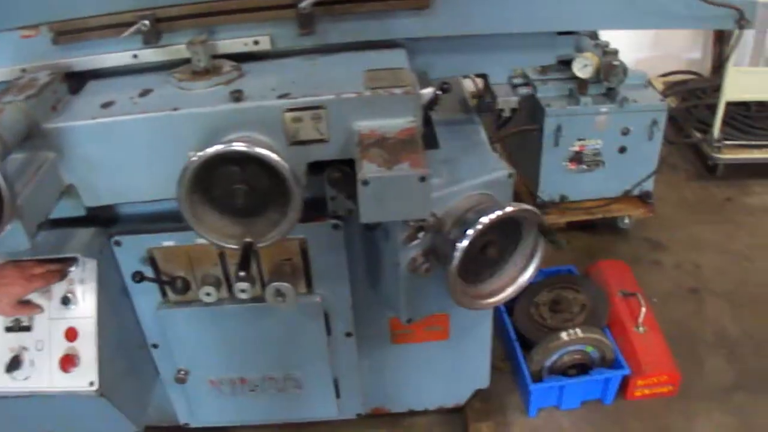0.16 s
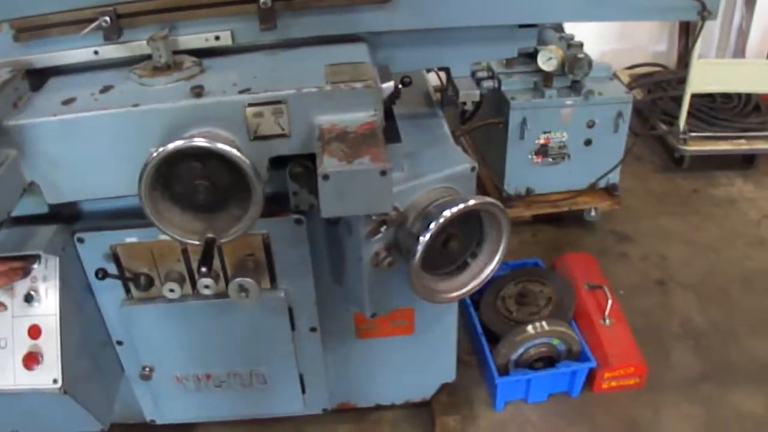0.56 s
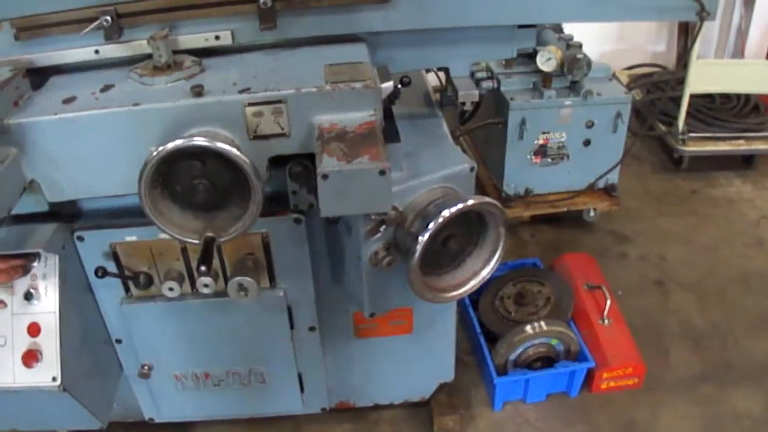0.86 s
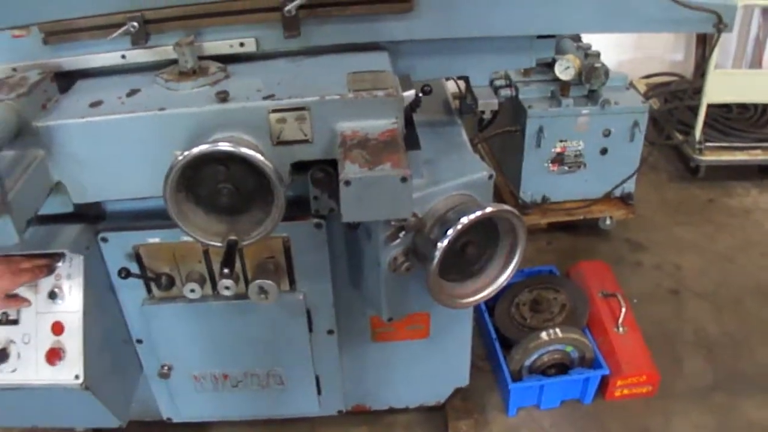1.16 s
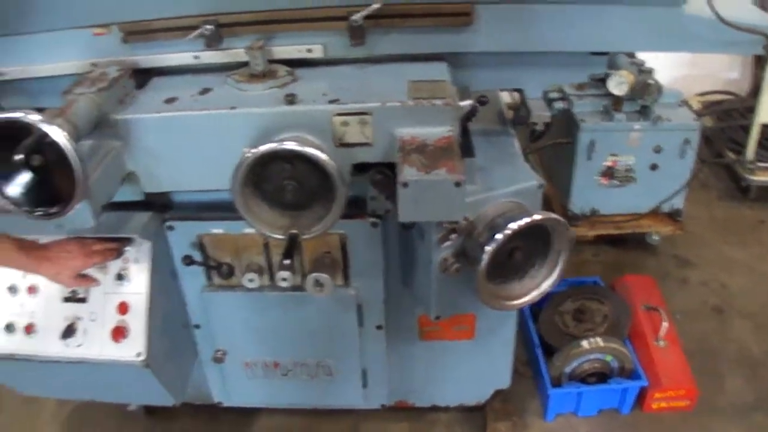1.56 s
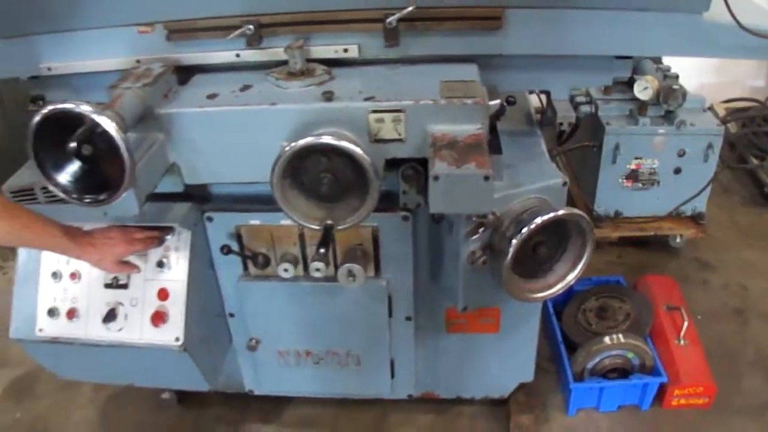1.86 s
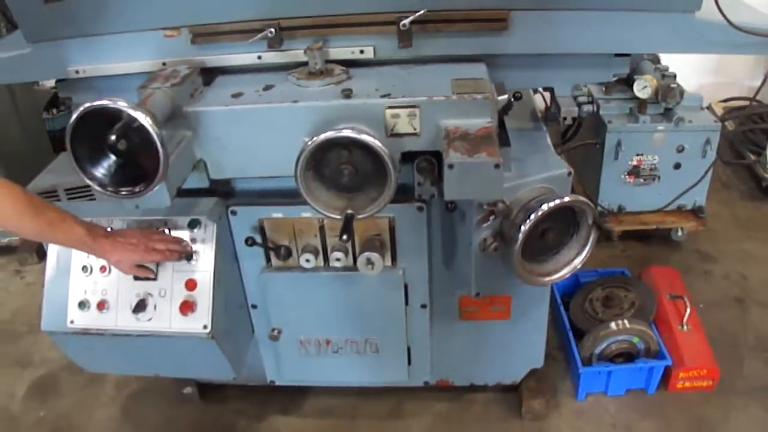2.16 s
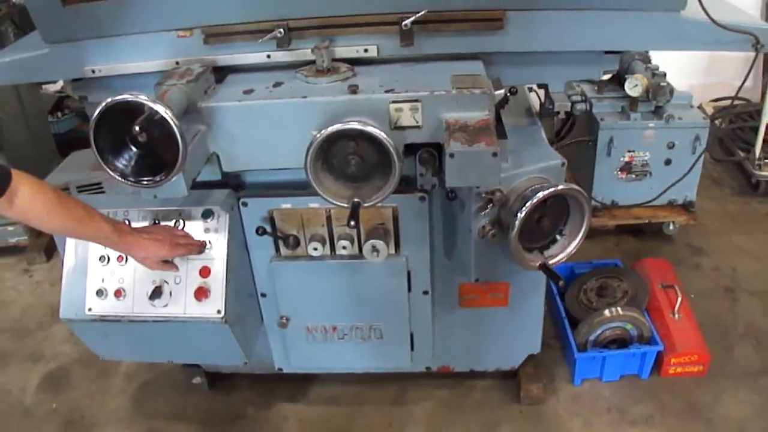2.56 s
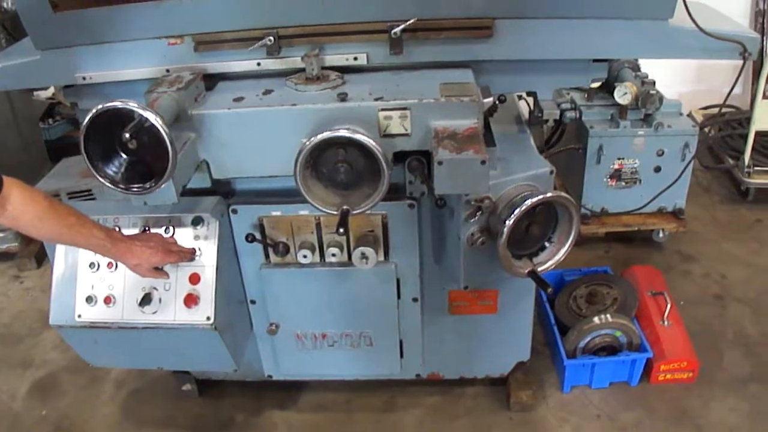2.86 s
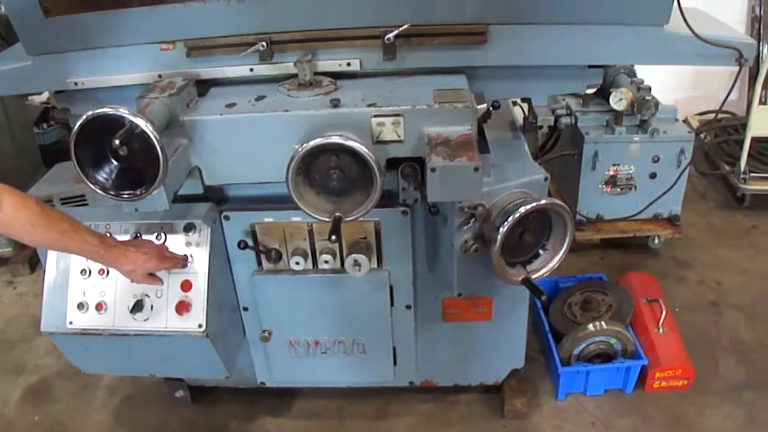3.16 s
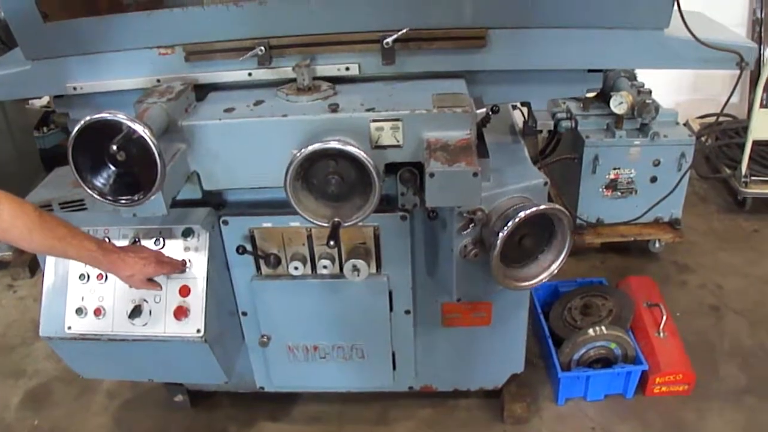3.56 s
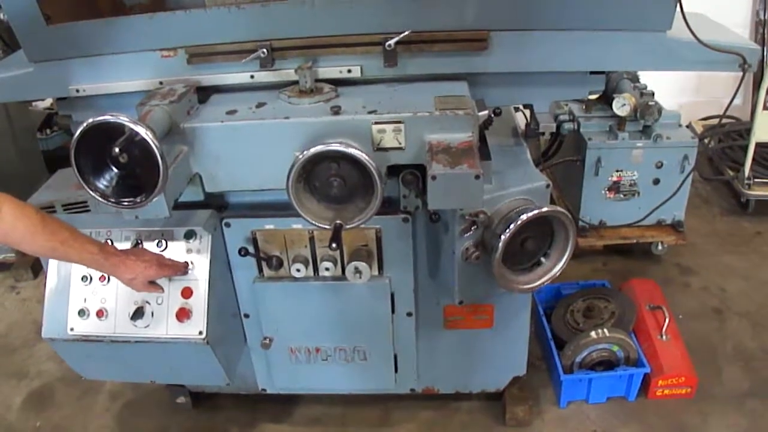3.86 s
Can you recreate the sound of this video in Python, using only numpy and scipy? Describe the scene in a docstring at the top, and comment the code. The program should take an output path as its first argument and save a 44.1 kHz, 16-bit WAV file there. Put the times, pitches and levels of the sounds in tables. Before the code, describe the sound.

A workshop grinder clatters, whines and ticks steadily, then winds down with rattling metal panels. After a short, quiet pause, a light click and an electrical clack restart it, and the ticking returns with a thin bearing squeal.

```python
"""A hydraulic pump runs in a workshop, coasts down and restarts with a contactor clack. Its drive clatters with
each shaft turn and belt lap, whines on shaft orders and ticks once a lap, about every fifth turn; the bearings
hiss and squeal. The cabinet booms and its panels rattle as the speed falls and rises. A soft hiss swells as it
comes to rest; mains hum and distant machines fill the pause."""
import sys
import numpy as np
from scipy import signal
from scipy.fft import rfft, irfft
from scipy.io import wavfile
from scipy.ndimage import uniform_filter1d, map_coordinates

SR = 44100
rng = np.random.default_rng(int(sys.argv[2]) if len(sys.argv) > 2 else 0)


def dump_mix(stems):
    """Bounce the given channels to the path in sys.argv[1] as a 16-bit WAV at rate SR."""
    frames = np.atleast_2d(stems).T  # one column per channel
    limited = np.clip(frames, -1, 1)  # hard clip at full scale
    pcm = np.round(limited * 32767).astype(np.int16)
    wavfile.write(sys.argv[1], SR, pcm)


N = 176400
RESTART_S = 3.25

FIRST_RPS, SECOND_RPS = 29.0, 29.26
# time_s, speed_rps
SHAFT_SPEED = [(0, FIRST_RPS), (1.82, FIRST_RPS), (1.92, 27), (2.02, 21.5), (2.13, 17.4), (2.35, 9),
               (2.6, 1), (3.25, 1), (3.35, 9), (3.415, 16.8), (3.44, 18), (3.475, 23), (3.52, 26.8),
               (3.55, 27.3), (3.59, 28.9), (3.66, SECOND_RPS), (4, SECOND_RPS)]


def shaft():
    """Slightly wobbling shaft speed and the running count of turns."""
    speed_rps = curve(SHAFT_SPEED) * (1 + 0.0015 * walk(25.47))
    return speed_rps, np.cumsum(speed_rps) / SR


# position_laps, width_laps, gain_db
LAP_SWELLS = [(.18, 0.023, 0.5), (.55, 0.029, 3), (.73, 0.04, 2)]
TURNS_PER_BELT = 5


def drive(turns):
    """Rough shaft and belt plus loose rattle, throbbing with each turn and swelling within each lap."""
    laps = turns / TURNS_PER_BELT
    rotating = undb(-5.5) * roughness(turns, points=1500) + undb(2.5) * roughness(laps, points=7500)
    throb = 1 + 0.16 * np.sin(2 * np.pi * turns) * np.sin(2 * np.pi * 3 * turns)
    swell_db = sum(db * np.exp(-((laps % 1 - at) / width) ** 2) for at, width, db in LAP_SWELLS)
    reverberant = room(rotating)
    loose = undb(-7) * rng.standard_normal(N)
    return throb * undb(swell_db) * (reverberant + loose)


def roughness(cycles, points):
    """The same random surface passes on every cycle of a rotating part."""
    return map_coordinates(rng.standard_normal(points), [cycles % 1 * points], order=1, mode="grid-wrap")


# freq_hz, gain_db
BEARING_SPECTRUM = [(2500, 8), (3500, -43), (4300, 3), (5200, 0.5), (6100, 3), (6700, 4.5), (7500, 2.5),
                    (8000, 4), (8650, 0), (9100, -6), (9500, -7), (9900, -6), (10250, -13.5), (10500, -1.5),
                    (11000, -19)]
# pitch_hz, width_hz, level_db
JINGLE_MODES = [(7600, 220, -5), (8150, 200, -4), (8580, 200, -0.5)]


def bearings():
    """Bearing hiss with an uneven metallic jingle."""
    jingle = unit(undb(4 * walk(90)) * rings(JINGLE_MODES))
    return undb(-0.5) * noise(BEARING_SPECTRUM) + undb(-7) * jingle


# time_s, drive_db, bearing_db
RUN_LEVELS = [(0.03, -21.5, -41), (0.06, -22, -42), (0.86, -23.5, -42.5), (1.96, -21.5, -41),
              (2.0, -21, -38.5), (2.21, -27.5, -49.5), (2.32, -35.5, -56), (2.44, -39, -62)]
RESTART_LEVELS = [(3.29, -39, -75), (3.402, -25, -44.5), (3.672, -20, -36.5), (3.682, -22.5, -39.5),
                  (3.96, -20.5, -40), (3.97, -20, -40.5)]
# freq_hz, gain_db
RUN_SPECTRUM = [(100, -42), (200, -28.5), (280, -19.5), (360, -5), (420, -8.5), (520, -5.5), (630, 0.5),
                (740, -1.5), (880, -2), (1050, -4), (1180, -3), (1500, -6.5), (1850, -10.5), (2300, -13),
                (2700, -16.5), (3000, -15), (3300, -23), (4000, -27)]
RESTART_SPECTRUM = [(100, -25.5), (270, -17), (360, -9.5), (520, -1.5), (620, 7), (760, -3.5), (900, 2.5),
                    (1250, -3), (1550, -0.5), (1900, -5), (2400, -11), (3100, -14), (4000, -22.5)]
DRIVE_TRIM_DB, STOP_DB_PER_S, FADE_IN_S = -1, 43, 0.03


def clatter(turns):
    """Drive and bearing noise dies away on coast-down and returns with a new timbre on restart."""
    rattle, bearing = drive(turns), bearings()

    def run(levels, spectrum):
        body = undb(curve(levels) + DRIVE_TRIM_DB) * colour(rattle, spectrum)
        return body + undb(curve(levels, column=2)) * bearing

    t = times()
    fade_out = undb(-STOP_DB_PER_S * np.maximum(t - RUN_LEVELS[-1][0], 0))
    fade_in = np.clip((t - RESTART_S) / FADE_IN_S, 0, 1)
    return fade_out * run(RUN_LEVELS, RUN_SPECTRUM) + fade_in * run(RESTART_LEVELS, RESTART_SPECTRUM)


# shaft_order (rounded when played), run_db, restart_db
WHINE_ORDERS = [(12, -45.5, -56), (13, -42, -50), (16, -20.5, -23), (19, -50, -38), (20, -39.5, -27.5),
                (21, -40, -21), (23, -48.5, -63), (25, -40, -43), (28, -34.5, -44), (29, -48.5, -32),
                (31, -34, -61), (32.02, -28.5, -24), (42, -49, -33), (45, -38.5, -37), (48, -46, -44),
                (52.05, -54, -34), (67.6, -80, -44), (78.03, -44.5, -43)]
# time_s, gain_db
WHINE_GAIN = [(0, 0), (1.0, 0), (1.5, -3.5), (1.85, -5), (2.05, -8), (2.4, -12), (3.3, -3), (3.5, -3.5),
              (3.62, -2.5), (4, -4.5)]
FULL_SLIP, SLIP_DB, SPEED_EXPONENT, RADIATES_ABOVE_HZ = 0.17, -14, 1.93, 246


def whine(speed_rps, turns):
    """Shaft orders weaken and judder below full speed; the bass does not radiate."""
    speed_ratio = speed_rps / speed_rps.max()
    slip = np.clip((1 - speed_ratio) / FULL_SLIP, 0, 1)
    tones = 0
    for order, run_db, restart_db in WHINE_ORDERS:
        db = np.where(times() < RESTART_S, run_db, restart_db) + walk(19.5) + slip * walk(47)
        phase = 2 * np.pi * (np.round(order) * turns + rng.random())
        tones += np.sqrt(2) * undb(db) * np.sin(phase)
    gain = undb(curve(WHINE_GAIN) + SLIP_DB * slip) * speed_ratio ** SPEED_EXPONENT
    highpass = signal.butter(8, RADIATES_ABOVE_HZ, "high", fs=SR, output="sos")
    return signal.sosfilt(highpass, gain * tones)


# start_s, level_db
BELT_TICKS = [(0.0044, -17.5), (0.1727, -17.5), (0.345, -18.5), (0.5174, -17.5), (0.6925, -17.5),
              (0.863, -18.5), (1.0355, -16.5), (1.2067, -19.5), (1.3824, -18.5), (1.5514, -17),
              (1.7258, -20), (1.8957, -16), (2.1224, -23.5), (3.498, -17), (3.6731, -18.5), (3.8427, -19)]
# freq_hz, gain_db
TICK_SPECTRUM = [(1200, -21), (2400, -2), (2950, 4.5), (3500, -2.5), (4500, -1), (5400, 3), (6400, -0.5),
                 (7500, -6.5), (7950, 1), (8600, 7.5), (9500, -1.5), (11000, -6.5)]
# pitch_hz, width_hz, level_db
TICK_MODES = [(3090, 100, 0), (5010, 50, -4), (5550, 200, -2), (7400, 540, 5.5), (8370, 190, -5),
              (9840, 42, -5)]
TICK_LEAD_S, TICK_HOLD_S, TICK_DECAY_S = 0.0071, 0.0041, 0.0035


def belt_ticks():
    """Each tick is a light touch, a sharp slap, a short room tail and a metallic ring."""
    power, ring = 0, 0
    for start_s, db in BELT_TICKS:
        touch = undb(-5) * burst(start_s - TICK_LEAD_S, TICK_DECAY_S, TICK_HOLD_S)
        slap = burst(start_s, TICK_DECAY_S, TICK_HOLD_S)
        tail = undb(-8) * burst(start_s, decay_s=0.043)
        power += undb(db - 7.5) ** 2 * (touch ** 2 + slap ** 2 + tail ** 2)
        ring += undb(db - 21) * burst(start_s, decay_s=0.03)
    return np.sqrt(power) * noise(TICK_SPECTRUM) + ring * rings(TICK_MODES)


# peak_s, pitch_hz, level_db, half_length_s
CABINET_BOOMS = [(1.944, 441.6, -28, 0.04), (2.024, 335, -38, 0.026), (2.034, 734, -29.5, .025),
                 (2.151, 278.6, -31, 0.022), (3.437, 277, -25.5, 0.021), (3.469, 361, -27.5, 0.017),
                 (3.489, 765, -21.5, 0.01), (3.541, 429.8, -25, 0.027)]


def cabinet_booms():
    """Cabinet resonances swell briefly, timed to the shaft crossing its critical speeds."""
    booms = 0
    for peak_s, hz, db, half_length_s in CABINET_BOOMS:
        swell = undb(db + 2 * walk(77)) * np.exp(-((times() - peak_s) / half_length_s) ** 2)
        booms += np.sqrt(2) * swell * tone(hz, waver_rad=0.26, waver_hz=106)
    return booms


# pitch_hz, width_hz, level_db
PANEL_MODES = [(287.4, 12.4, -10.5), (458.5, 18, -7), (948.4, 4, -6.5), (1523, 48, -9.5)]
# time_s, gain_db
PANEL_GAIN = [(0, -42), (1.8, -35), (2.03, -28.5), (2.35, -32.5), (2.7, -50), (3.25, -51), (3.45, -35),
              (3.65, -28.5), (3.75, -41.5), (4, -40.5)]


def panels():
    """Sheet-metal panels ring at their own pitches, loudest around the speed changes."""
    return undb(curve(PANEL_GAIN)) * rings(PANEL_MODES)


# start_s, end_s, level_db
BEARING_SQUEALS = [(1.95, 2.17, -42), (2.17, 2.36, -52), (3.59, 3.70, -43), (3.77, 3.90, -46),
                   (3.91, 4.05, -44)]
SQUEAL_HZ, SQUEAL_RAMP_S = 6430, 0.035


def bearing_squeal():
    """A bearing's thin, unsteady whistle comes and goes."""
    t, envelope = times(), 0
    for start_s, end_s, db in BEARING_SQUEALS:
        envelope += undb(db) * np.clip(np.minimum(t - start_s, end_s - t) / SQUEAL_RAMP_S, 0, 1)
    flicker = undb(2 * walk(60))
    return envelope * flicker * tone(SQUEAL_HZ, waver_rad=1.3, waver_hz=120)


# start_s, level_db, decay_s
CONTACTOR_CLACKS = [(3.249, -33, 0.012), (3.263, -38, 0.0084)]
# freq_hz, gain_db
CLACK_SPECTRUM = [(150, -4), (280, -1), (1000, 3.5), (1500, 0.5), (2300, -9), (4000, -13.5), (4900, -1.5),
                  (5600, -13), (7500, -7), (11000, -21)]


def contactor():
    """The contactor closes and bounces, each clack with a room tail."""
    envelope = 0
    for start_s, db, decay_s in CONTACTOR_CLACKS:
        tail = undb(-1.5) * burst(start_s, decay_s=0.081)
        envelope += undb(db) * (burst(start_s, decay_s) + tail)
    return envelope * noise(CLACK_SPECTRUM)


# start_s, level_db
BUTTON_CLICKS = [(2.925, -41), (2.958, -38.5)]
# freq_hz, gain_db
BUTTON_SPECTRUM = [(2500, 6), (3500, 3), (7000, 0), (9000, -10)]


def button():
    """The start button clicks lightly as it is pressed."""
    envelope = sum(undb(db) * burst(start_s, decay_s=0.003) for start_s, db in BUTTON_CLICKS)
    return envelope * noise(BUTTON_SPECTRUM)


# time_s, level_db
HISS_LEVELS = [(2.43, -47), (2.475, -38), (2.52, -36.5), (2.545, -33.5), (2.58, -35), (2.6, -30.5),
               (2.64, -32), (2.7, -41), (2.85, -45), (3.2, -53.5)]
# freq_hz, gain_db
HISS_SPECTRUM = [(150, -51), (250, -21), (332, -20), (365, -15), (388, -26), (462, -7), (1410, 1),
                 (3000, -11.5), (6400, -12.5), (8490, -17), (10800, -35), (14000, -63), (22000, -120)]


def hiss():
    """A soft rush swells as the drive comes to rest."""
    return undb(curve(HISS_LEVELS) + walk(44)) * noise(HISS_SPECTRUM)


# pitch_hz, level_db
HUM_TONES = [(120, -67), (182, -55), (240, -63), (468, -67), (931, -60), (1082, -59), (2401, -69),
             (3661, -74), (6665, -77), (7868, -64)]
# freq_hz, gain_db
MACHINERY_SPECTRUM = [(15, -71), (25, -28), (148, -13), (181, -4), (245, -4), (265, -11), (872, -7),
                      (1070, -7), (1240, -16), (4540, -26.5), (7350, -45), (8130, -33), (10800, -29),
                      (14000, -78), (22000, -120)]


def workshop():
    """Mains hum, idle whines and distant machinery."""
    hum = 0
    for hz, db in HUM_TONES:
        hum += np.sqrt(2) * undb(db + 1.9 * walk(5.9)) * tone(hz, waver_rad=0.31, waver_hz=11)
    return hum + undb(-50) * noise(MACHINERY_SPECTRUM)


def room(x, t60_s=1, tail_db=-6):
    """Direct sound plus the workshop's diffuse tail."""
    tail = rng.standard_normal(SR) * undb(-60 * times()[:SR] / t60_s)
    return x + undb(tail_db) * signal.fftconvolve(x, tail / np.linalg.norm(tail))[:N]


def undb(db):
    return 10 ** (np.asarray(db) / 20)


def unit(x):
    return x / np.sqrt(np.mean(x ** 2))


def times():
    return np.arange(N) / SR


def curve(table, column=1):
    """One table column, interpolated linearly in time."""
    table = np.array(table)
    return np.interp(times(), table[:, 0], table[:, column])


def colour(x, spectrum):
    """Shape x by a spectrum, falling 37 dB per octave past both ends; rms 1."""
    hz, db = np.array(spectrum).T
    octaves = np.log2(np.maximum(np.fft.rfftfreq(N, 1 / SR), 1))
    outside = np.abs(octaves - np.clip(octaves, np.log2(hz[0]), np.log2(hz[-1])))
    gain_db = np.interp(octaves, np.log2(hz), db) - 37 * outside
    return unit(irfft(rfft(x) * undb(gain_db), N))


def noise(spectrum):
    return colour(rng.standard_normal(N), spectrum)


def rings(modes):
    """Narrow resonances shaken at random."""
    ringing = 0
    for hz, width_hz, db in modes:
        peak = signal.iirpeak(hz, hz / (2 * width_hz), fs=SR)
        band = signal.lfilter(*peak, rng.standard_normal(N))
        ringing += undb(db) * unit(signal.lfilter(*peak, band))
    return ringing


def walk(rate_hz):
    """Smooth random drift; rms 1."""
    window = int(SR / rate_hz)
    smoothed = uniform_filter1d(rng.standard_normal(N), window, mode="wrap")
    return unit(uniform_filter1d(smoothed, window, mode="wrap"))


def tone(hz, waver_rad, waver_hz):
    """Sine with drifting phase."""
    return np.sin(2 * np.pi * hz * times() + waver_rad * walk(waver_hz))


def burst(start_s, decay_s, hold_s=0, attack_s=0.004):
    """Envelope: quick attack, hold, exponential release."""
    age_s = times() - start_s
    return np.clip(age_s / attack_s + 0.5, 0, 1) * np.exp(-np.maximum(age_s - hold_s, 0) / decay_s)


def scene():
    """The pump, its switches and the workshop, in mono."""
    speed_rps, turns = shaft()
    pump = clatter(turns) + whine(speed_rps, turns) + cabinet_booms() + panels() + belt_ticks()
    return (pump + bearing_squeal() + contactor() + button() + hiss() + workshop())[None]


def record(dry, cutoff_hz=10950):
    """A steep low-pass cuts the top treble."""
    return signal.sosfilt(signal.ellip(10, 0.2, 70, cutoff_hz, fs=SR, output="sos"), dry)


dry = scene()
out = record(dry)
dump_mix(out)
```